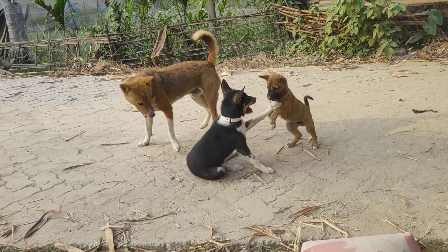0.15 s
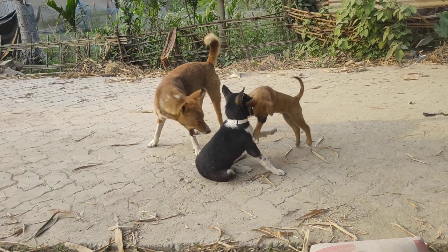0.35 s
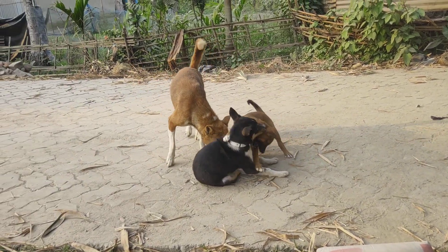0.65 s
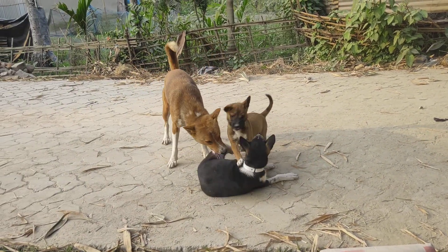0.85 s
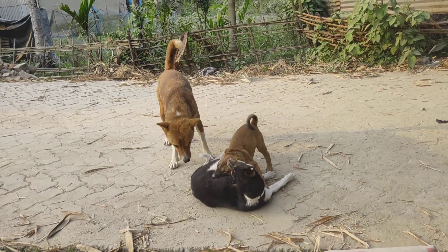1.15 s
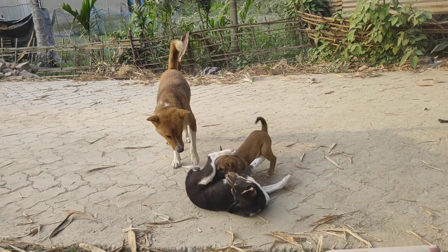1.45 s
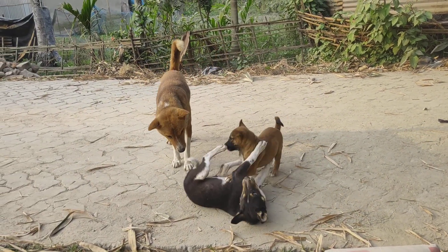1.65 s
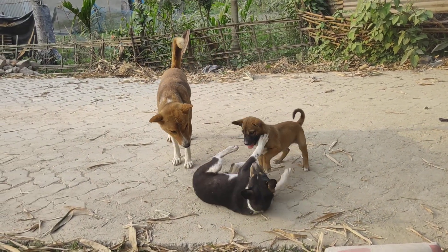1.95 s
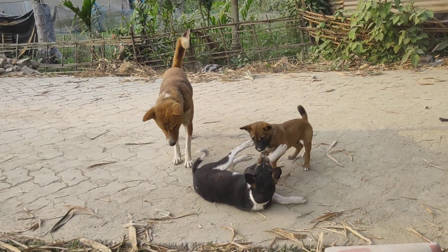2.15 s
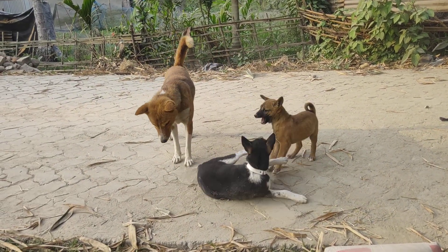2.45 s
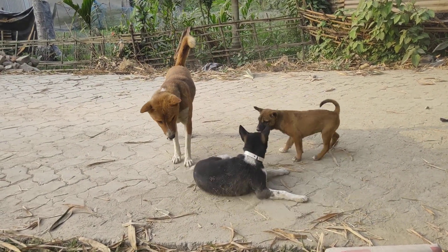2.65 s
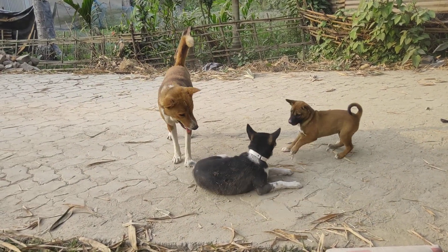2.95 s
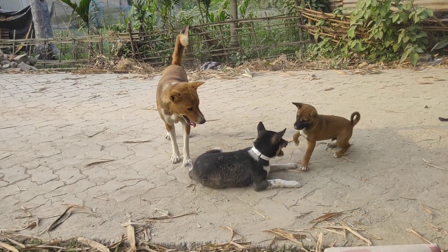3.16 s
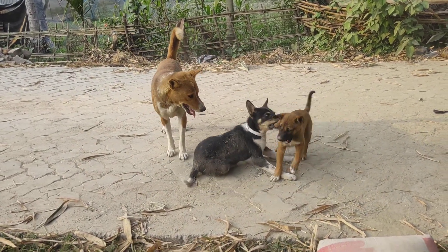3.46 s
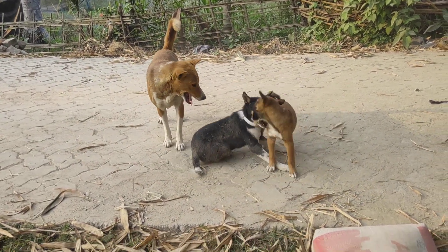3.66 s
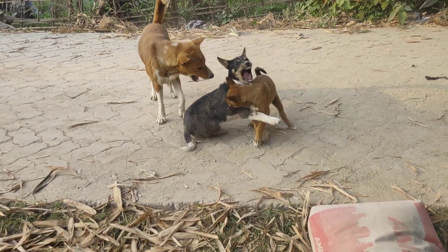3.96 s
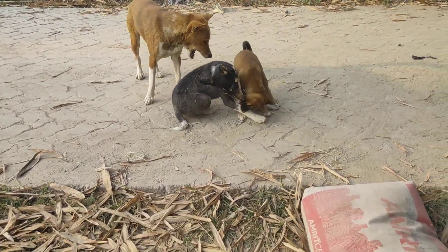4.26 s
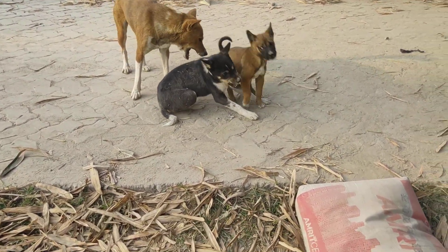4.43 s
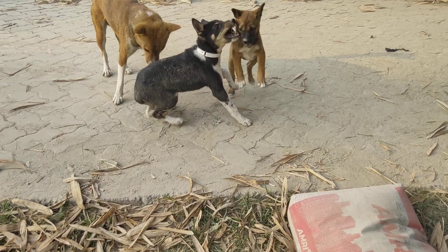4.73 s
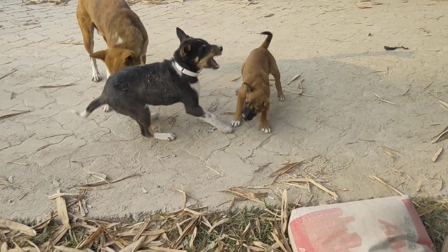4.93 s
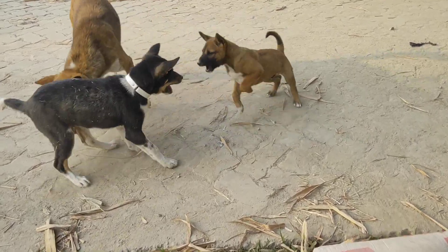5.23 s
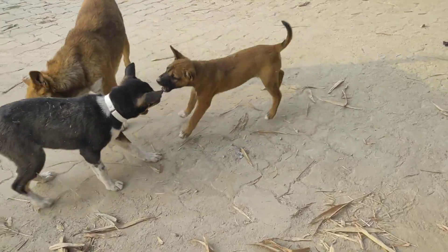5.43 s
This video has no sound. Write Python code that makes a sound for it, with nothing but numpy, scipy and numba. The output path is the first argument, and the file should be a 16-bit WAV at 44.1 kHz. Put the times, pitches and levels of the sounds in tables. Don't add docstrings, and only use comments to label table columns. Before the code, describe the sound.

Dogs wrestle a few metres from a handheld stereo microphone. At first there are only claw clicks, dragging paws and hedge birds, then a small yelp and soft throaty rumbles. Around the middle, brief squeaks and a faint whimper precede wavering growls that grow rougher and louder. The last second holds raspy, high-pitched barks over rustling dry leaves, with short echoes from ground and fence.

```python
import sys
import numpy as np
from scipy import signal
from scipy.fft import next_fast_len
from scipy.io import wavfile
from scipy.ndimage import uniform_filter1d, minimum_filter1d
from numba import njit

SR = 44100
rng = np.random.default_rng(int(sys.argv[2]) if len(sys.argv) > 2 else 0)


def put_to_file(sound):
    columns = np.atleast_2d(sound).T
    safe = np.clip(columns, -1, 1)
    whole_steps = np.round(safe * 32767)
    wavfile.write(sys.argv[1], SR, whole_steps.astype(np.int16))


def boost_factor(decibels):
    exponent = np.asarray(decibels, float) / 20
    return 10 ** exponent


N = 246519
TIME = np.arange(N) / SR

# [pitch_hz, density_db_per_hz]
YARD_SPECTRUM = [(25, -21.5), (40, -6), (52, -19), (82, -1.5), (120, -10.5), (228, -7), (446, -26.5),
                 (607, -18.5), (860, -22), (1150, -16.5), (2140, -26), (2910, -24), (3840, -45),
                 (4540, -33.5), (8650, -48.5), (16000, -85)]
YARD_DB = -63
# [time_s, change_db]
BREEZE = [(0, -6.5), (.3, -2), (.42, -12), (.6, -10.5), (.7, 7), (1.5, 0.5), (1.62, -13), (1.75, -4.5),
          (1.9, 1.5), (2.2, -2.5), (2.34, -10), (2.42, 3), (3.05, 2), (3.15, -5), (3.42, -10.5), (3.5, 5)]
# [time_s, change_db]
LEAF_HUSH = [(0, -7.5), (.11, -22), (.13, 3), (.6, 0), (.7, 7.5), (1.55, 2), (1.66, -13), (1.85, -22),
             (1.95, 5), (2.2, 0), (2.33, -7), (2.45, 5.5), (3.15, 5.5), (3.3, 5.5), (3.5, 4)]

# [start_s, length_s, first_hz, last_hz, level_db]
BIRD_SLIDES = [(0.0, .11, 3640, 3480, -72), (1.655, .055, 2970, 3000, -66), (1.715, .06, 3000, 2960, -78),
               (1.875, .035, 3400, 2500, -62), (2.325, .06, 2570, 2550, -63),
               (2.385, .035, 2520, 2570, -68), (2.43, .07, 2560, 2530, -74), (2.535, .065, 4850, 4450, -69),
               (2.66, .065, 4180, 3930, -65), (2.815, .06, 3800, 3630, -66), (3.19, .05, 3700, 3560, -65),
               (3.345, .06, 4600, 4540, -73)]
# [start_s, length_s, rim_hz, turning_hz, level_db]
BIRD_BENDS = [
    (.26, .11, 4450, 3890, -68),
    (3.415, .08, 4400, 3960, -65),
    (2.92, .13, 3640, 3710, -68),
    (3.04, .15, 3690, 3590, -66),
]
# [start_s, length_s, first_hz, last_hz, level_db]
BIRD_DROPS = [
    (4.72, .09, 5350, 3600, -69),
    (1.695, .04, 4600, 4050, -82),
    (1.77, .085, 2970, 3450, -68),
]
# [start_s, length_s, rim_hz, turning_hz, level_db]
CHIRPS = [
    (.845, .075, 3010, 3100, -65),
    (1.172, .085, 3170, 3330, -58),
    (1.385, .1, 3000, 3200, -63),
]
NOTE_EDGE, NOTE_EDGE_DB = .22, -8

# [loudest_s, length_s, level_db]
DUST = [(.19, 0.13, -74), (.42, 0.16, -76), (.68, 0.59, -66), (.95, 0.32, -71), (1.25, 0.28, -70),
        (1.51, 0.17, -64.5), (1.76, .05, -77), (2.04, 0.12, -60), (2.37, 0.06, -64.5), (2.52, 0.71, -68.5),
        (2.79, 0.4, -58), (3.32, 0.24, -59.5), (3.6, 0.58, -63.5), (4.08, 0.5, -71), (4.4, 0.063, -55.5),
        (4.58, 0.44, -61), (5.0, 0.52, -57.5), (5.3, 0.15, -58.5), (5.45, 0.066, -59), (5.59, 0.31, -50)]
# [loudest_s, length_s, thud_db, scrape_db, grit_db]
SCUFFS = [(.2, 0.43, -71, -57, -110), (.45, 0.7, -101, -61.5, -91), (.778, 0.15, -70, -54.5, -63.5),
          (1.036, 0.025, -52.5, -80, -74), (1.15, 0.22, -54, -90, -92), (1.49, 0.32, -73.5, -57.5, -66),
          (1.85, 0.3, -84, -59.5, -84), (2.03, 0.17, -66, -54.5, -59.5), (2.4, 0.14, -95, -61, -85),
          (2.58, 0.52, -74, -56, -92), (3.0, 0.62, -76, -63.5, -90), (3.31, 0.17, -65, -54, -62),
          (3.46, 0.03, -57, -58, -84), (3.78, 0.29, -86, -59.5, -99), (3.97, 0.0099, -75, -47, -90),
          (4.08, 0.074, -68, -83, -92), (4.41, 0.99, -66, -58, -72.5), (4.8, 1, -75, -59.5, -94),
          (5.3, 1, -65.5, -53, -74), (5.44, 0.026, -61, -58, -57.5)]
STROKE_RISE, STROKE_DROP_DB = 0.33, 21.5
# [loudest_s, peak_db, pitch_hz, treble_db, length_ms]
TICKS = [(.128, -55.5, 2660, -2, 8.2), (.166, -58, 2610, -1, 13), (.205, -51.5, 2210, -9.5, 10.6),
         (0.233, -50.5, 1910, -30, 13), (.246, -56, 2700, -4, 2.5), (0.28, -49, 2540, -45, 11),
         (0.475, -44.5, 1845, -37, 6.1), (.686, -47, 2660, 1.5, 2), (.708, -50, 940, -25, 5.4),
         (.803, -46, 2110, -26, 5.8), (1.095, -54.5, 2400, -13, 3.9), (1.381, -46.5, 2570, -7, 2.6),
         (1.489, -44.5, 2370, -25, 1.3), (1.496, -42, 1840, -0.5, 1.3), (1.517, -47.5, 2000, -9, 2.5),
         (1.522, -43, 2360, -6.5, 1.7), (1.743, -57.5, 1970, -14, 1.5), (1.798, -45.5, 1800, -24, 1.5),
         (1.873, -49, 1590, -15, 1.5), (1.97, -52, 2320, -9, 10), (1.995, -49, 2270, -5.5, 1.4),
         (2.039, -58.5, 2270, -1, 21), (2.13, -51.5, 1690, -17, 2), (2.381, -54, 960, -16, 15),
         (2.415, -54, 1900, -26, 15), (3.122, -57, 2230, -9, 7.5), (3.12, -54.5, 1750, -27, 6.5),
         (3.681, -55, 2930, 0.5, 2.8), (4.402, -56, 695, -2, 5)]

# [start_s, length_s, first_hz, last_hz, level_db]
SQUEAKS = [
    (2.222, 0.081, 2340, 2108, -52),
    (2.298, 0.031, 2570, 2570, -52),
    (5.352, .08, 2350, 2080, -55),
]
# [start_s, length_s, rim_hz, turning_hz, level_db]
WHINES = [
    (2.2, .2, 1160, 1290, -68),
    (4.295, .12, 675, 695, -64),
]
# [start_s, length_s, first_hz,
# last_hz, level_db]
GAPES = [(2.595, 0.084, 1730, 1770, -50), (2.73, 0.056, 2750, 2890, -49.5), (2.8, 0.15, 2900, 2920, -59.5),
         (2.72, 0.31, 1790, 1760, -60.5), (2.965, 0.037, 1800, 1840, -70), (3.456, 0.031, 1770, 1780, -46),
         (3.5, 0.064, 2750, 2720, -60), (3.57, .17, 1700, 1840, -47.5), (3.6, 0.079, 2290, 2340, -55),
         (3.85, 0.12, 1700, 1710, -48.5), (3.935, 0.043, 1726, 1660, -47), (4.125, 0.091, 250, 522, -38.5),
         (4.155, 0.072, 1580, 1560, -45.5), (4.16, 0.041, 2990, 2680, -55), (4.2, 0.089, 534, 614, -44),
         (4.46, 0.026, 2580, 2550, -56), (4.5, 0.067, 1254, 837, -30.5), (4.505, 0.046, 2560, 2420, -40.5),
         (4.53, 0.046, 2160, 2100, -46.5), (4.6, 0.1, 2660, 2550, -55), (4.66, 0.091, 1685, 1680, -40),
         (4.7, 0.034, 3470, 3200, -45.5), (4.945, 0.061, 1690, 1950, -43), (4.985, 0.0535, 2080, 2400, -33),
         (4.995, 0.04, 1770, 1670, -31.5), (4.99, 0.034, 3550, 3680, -45), (5.01, 0.043, 2530, 2870, -40),
         (5.07, 0.068, 1620, 1590, -42), (5.1, 0.081, 2540, 2630, -51.5), (5.18, 0.032, 3630, 3700, -51.5),
         (5.2, 0.064, 2580, 2400, -48), (5.23, 0.049, 1790, 1800, -46), (5.435, 0.058, 2510, 2310, -43.5),
         (5.48, 0.08, 1940, 1930, -41.5), (5.52, 0.044, 3510, 3560, -50),
         (0.732, 0.082, 1890, 2260, -58), (0.974, 0.1, 1360, 1460, -61), (1.143, 0.059, 1770, 1810, -56),
          (1.174, 0.091, 1400, 1460, -56), (1.177, .12, 2150, 1970, -61), (1.18, 0.052, 2800, 2830, -58),
          (1.244, 0.054, 2530, 2540, -63.5), (2.776, .21, 600, 580, -52), (2.74, 0.26, 940, 830, -56)]
# [time_s, length_s, change_db]
SURGES = [(2.66, 0.039, 6.5), (2.685, .012, 4), (2.75, 0.038, 5.5), (2.852, 0.031, 7.5),
          (3.492, 0.0088, 12), (3.51, 0.0057, -3), (3.523, 0.0077, 12), (3.535, 0.0044, -5),
          (3.55, 0.0088, 11), (3.58, 0.012, -4), (3.605, 0.0058, -3), (4.963, 0.0055, 3.5),
          (4.968, 0.0044, -20), (4.977, 0.0074, 5), (5.013, 0.02, -8), (5.032, 0.011, 4), (5.049, 0.015, 8),
          (5.064, 0.0049, 0), (5.07, 0.005, 12), (5.091, 0.0068, 14), (5.133, .008, 4),
          (5.159, 0.0044, 9.5), (5.17, 0.012, 6), (5.188, 0.0047, 9), (5.452, 0.0078, -1),
          (5.477, .006, 2.5), (5.516, 0.0091, 4), (5.534, 0.0034, -3), (5.54, .005, 7.5), (5.578, 0.004, 0)]

# [time_s, chest_hz, chest_db, rasp_db, mouth_hz]
RUMBLES = [
    [(.68, 120, -57, -72, 965), (.742, 155.4, -50.5, -63, 915), (.782, 141.9, -50, -58, 880),
     (.882, 126.1, -54.5, -81, 920), (1.01, 139.5, -51, -54, 990), (1.066, 152, -59, -69, 1050),
     (1.12, 119.9, -50, -97, 1037)],
    [(1.1, 124.6, -71, -52.5, 1000), (1.128, 106.6, -48, -65, 940), (1.176, 123, -45.5, -47, 910),
     (1.236, 123.4, -44.5, -46, 940), (1.36, 90, -59, -67, 910)],
]
# [time_s, chest_hz, chest_db, rasp_db, mouth_hz]
GROWLS = [
    [(2.6, 151.2, -64, -64, 1350), (2.625, 158.6, -51, -50.5, 1330), (2.654, 172, -43, -48.5, 1270),
     (2.712, 156.8, -47.5, -52, 1210), (2.75, 168.5, -43.5, -50.5, 1175), (2.864, 177.3, -44.5, -53, 1190),
     (2.975, 172, -44.5, -54.5, 1067), (3.0, 167, -79, -67, 1177)],
    [(3.447, 145.2, -74, -58, 1400), (3.468, 154.2, -39, -45, 1350), (3.498, 174.3, -43.5, -45.5, 1350),
     (3.626, 197.9, -39.5, -41.5, 1306), (3.714, 175.5, -41, -39.5, 1296), (3.76, 159.9, -69, -73, 1320)],
    [(3.85, 179.8, -66, -69, 1200), (3.88, 176.3, -46, -42, 1200), (3.942, 185.4, -46, -52, 1190),
     (3.98, 189, -89, -98, 1200)],
    [(4.12, 188.7, -57, -99, 1230), (4.162, 209.7, -47.5, -43, 1240), (4.252, 212.8, -39.5, -45, 1230),
     (4.31, 198, -64, -60, 1160)],
]
# [time_s, chest_hz, chest_db, rasp_db, mouth_hz]
BARKS = [
    [(4.438, 160.2, -49.5, -56, 994), (4.474, 188.6, -40, -46, 1060), (4.532, 306.1, -37, -32.5, 914),
     (4.562, 261.2, -37.5, -40.5, 870), (4.61, 206.9, -39, -40, 1020), (4.715, 260, -36, -33, 1023),
     (4.762, 196, -45.5, -49, 1060)],
    [(4.893, 165.8, -45, -41, 1060), (4.94, 188.7, -42.5, -38.5, 1160), (4.96, 195.4, -47.5, -33.5, 1200),
     (4.985, 225.8, -35.5, -30, 1234), (5.022, 310.6, -34.5, -30.5, 1050), (5.07, 233, -32.5, -37, 1135),
     (5.15, 245.5, -32.5, -30, 1053), (5.2, 208.6, -36.5, -38, 1100), (5.252, 199.8, -38.5, -44.5, 1200),
     (5.278, 161, -55, -51, 1230)],
    [(5.43, 177, -44, -49.5, 1100), (5.456, 194.6, -37.5, -34, 1087), (5.538, 250.9, -34.5, -29.5, 1074),
     (5.59, 238.4, -37.5, -27, 1164)],
]
# [time_s, chest_hz, chest_db, rasp_db, mouth_hz]
YELPS = [
    [(.58, 136.1, -55, -91, 1240), (.626, 186.2, -49, -59.5, 1240), (.67, 219.4, -72, -60, 1320)],
]
# [partials_db, throat_db, muzzle_db, muzzle_hz]
RUMBLE_POSES = [(-5, -12.5, -2.5, 1800), (0.5, -12, -13, 1820)]
GROWL_POSES = [(-3.5, -11, -6.5, 1715), (-7.5, -16, -9.5, 1630), (0, -7, -5.5, 1660),
               (-7.5, 0.5, -14, 1440)]
BARK_POSES = [(-13.5, -5.5, -10, 1620), (-10.5, -11, -9, 1620), (-22.5, -14.5, -13.5, 1740)]
YELP_POSES = [(-1.5, -6.5, 3.5, 1790)]
# [multiple, level_db]
RUMBLE_LINES = [(1.5, -2), (2, -3), (2.5, -9), (.5, -18)]
GROWL_LINES = [(1.5, -4), (2, -7), (2.5, -13), (.5, -20)]
BARK_LINES = [(2, 1.5), (3, -11), (4, 0)]
# [pitch_hz, width_hz, level_db]
MUZZLE = [(2740, 420, -4), (3500, 440, -8.5), (4260, 740, -10.5), (6930, 1700, -19.5)]
THROAT_HZ, MOUTH_WIDTH_HZ = 544, 245
THROAT_LIFT_DB = 5
PARTIAL_DRIFT = .15
PARTIALS_SHARE, THROAT_SHARE, MUZZLE_SHARE = 0.16, 0.31, 0.67

# [time_s, lag_ms]
DOG_LAG = [(0, 0.1), (1.2, 0.15), (2.8, 0.14), (4.0, 0.16), (4.6, 0.16), (5.6, 0.21)]
# [delay_ms, level_db]
ECHOES = [(3.1, -9.5), (7.3, -20), (13.0, -16.5), (23.0, -13), (41.0, -62), (67.0, -15)]
# [pitch_hz, threshold_db]
THRIFT = [(2800, -8), (3600, -2), (5000, -.6), (7000, 1), (9000, 1.8), (15000, 1.9)]
TOP_HZ = 15790


def unit(x):
    return x / np.sqrt(np.mean(x ** 2) + 1e-18)


@njit
def svf(x, hz, width):
    y, b, l = np.empty(len(x)), 0., 0.
    for i in range(len(x)):
        g, k = np.tan(np.pi * hz[i] / SR), width / hz[i]
        v = (b + g * (x[i] - l)) / (1 + g * (g + k))
        b, l, y[i] = 2 * v - b, l + 2 * g * v, k * v
    return y


def band(x, hz, width_hz):
    hz = np.clip(hz * np.ones(len(x)), 10, .45 * SR)
    return svf(svf(x, hz, 1.075 * width_hz), hz, 1.075 * width_hz)


def walk(rate_hz, n=N):
    k = int(SR / rate_hz)
    held = np.repeat(rng.standard_normal(n // k + 1), k)
    return 1.3 * uniform_filter1d(uniform_filter1d(held, k), k)[:n]


def play(tables, sound, fade_s=0.0024, drive=None):
    out = np.zeros(N)
    for table in tables:
        s, *columns = np.transpose(table)
        a, b = int(s[0] * SR), min(int(s[-1] * SR), N)
        t = TIME[a:b]
        fade = np.clip(np.minimum(t - s[0], s[-1] - t) / fade_s, 0, 1)
        curves = [np.interp(t, s, c) for c in columns]
        if drive is not None:
            curves.append(drive[a:b])
        out[a:b] += fade * sound(*curves)
    return out


def even(u):
    return u


def bend(u, turn=.38):
    return np.sin(np.pi * u ** (np.log(.5) / np.log(turn))) ** 2


def note_curves(rows, shape):
    u = np.linspace(0, 1, num=17)
    edge_db = NOTE_EDGE_DB * (1 - np.clip(np.minimum(u, 1 - u) / NOTE_EDGE, 0, 1)) ** 2
    return [np.transpose([s + u * length, first + (last - first) * shape(u), db + edge_db])
            for s, length, first, last, db in rows]


def strokes(rows):
    power = 1e-13
    for s, length, *db in rows:
        away = np.maximum((s - TIME) / STROKE_RISE, TIME - s) / length
        power = power + boost_factor(2 * (np.array(db)[:, None] - STROKE_DROP_DB * away))
    return 10 * np.log10(power)


def tone(hz, db, wobble=0.015, flutter_db=9.0):
    n = len(hz)
    phase = 2 * np.pi * np.cumsum(hz * (1 + wobble * walk(71.4, n))) / SR
    return np.sqrt(2) * boost_factor(db + flutter_db * walk(69.0, n)) * np.sin(phase)


def spaced(x, lag_ms, left_db, wet_db, shade_db=-47.0):
    late = np.interp(TIME - lag_ms / 1000, TIME, x)
    late = late + boost_factor(shade_db) * band(late, 2770.0, 2350.0)
    out = np.array([late * boost_factor(left_db / 2), x * boost_factor(-left_db / 2)])
    reflected = band(x, 3840.0, 4000.0)
    for side, skew in zip(out, (.93, 1.08)):
        for ms, db in ECHOES:
            k = int(ms * skew * SR / 1000)
            side[k:] += boost_factor(db + wet_db) * reflected[:-k]
    alike = signal.lfilter(*signal.butter(1, 170., fs=SR), out[0] - out[1]) / 2
    return out - alike * np.array([[1], [-1]])


def yard():
    out, swell = 0, walk(3.7)
    f, level_db = np.transpose(YARD_SPECTRUM)
    breeze_db = np.interp(TIME, *np.transpose(BREEZE))
    leaves_db = np.interp(TIME, *np.transpose(LEAF_HUSH))
    for hz in 25 * 2 ** np.arange(0, 9.4, 1 / 3):
        mid, side = (band(rng.standard_normal(N), hz, hz / 4) for _ in range(2))
        db = np.interp(np.log(hz), np.log(f), level_db) + 1.5 * swell + 2.5 * walk(7)
        db += breeze_db * np.exp(-np.log(hz / 450.0) ** 2 / 1.5) + leaves_db * (hz > 3300)
        spread = np.clip(0.073 + hz / 1600.0, 0, 1)
        out = out + boost_factor(db) * (mid + spread * side * np.array([[1], [-1]]))
    return unit(out) * boost_factor(YARD_DB + 4.0)


def chirp(hz, db):
    air = unit(band(rng.standard_normal(len(hz)), hz, .07 * hz.mean()))
    return tone(hz, db - 1.5, .007, 2.5) + boost_factor(db - 5) * air


def whistles():
    clear = note_curves(BIRD_SLIDES, even) + note_curves(BIRD_BENDS, bend)
    clear += note_curves(BIRD_DROPS, lambda u: u ** 2.0)
    clear_song = play(clear, lambda hz, db: tone(hz, db - 2, .003, 2.0), fade_s=.012)
    return clear_song + play(note_curves(CHIRPS, bend), chirp)


def hedge(x, t60_s=.3, wet_db=-7.0):
    t = TIME[:SR // 3]
    tail = rng.standard_normal(len(t)) * boost_factor(-60 * t / t60_s)
    return x + boost_factor(wet_db) * signal.fftconvolve(x, tail / np.linalg.norm(tail))[:N]


def grains(n, spread_db):
    return rng.standard_normal(n) * boost_factor(spread_db * walk(400, n))


def dust():
    hiss = grains(N, 3.7)
    low, high = unit(band(hiss, 12500.0, 11000.0)), unit(band(hiss, 15500.0, 6000.0))
    return boost_factor(strokes(DUST)[0]) * unit(low + boost_factor(-3) * high)


def scuff(thud_db, scrape_db, grit_db):
    grit = grains(len(thud_db), 2.5)
    parts = (thud_db, 620., 600.), (scrape_db, 2100., 1700.), (grit_db, 5200., 2600.)
    return sum(boost_factor(db) * unit(band(grit, hz, width)) for db, hz, width in parts)


def ticks():
    out, t = np.zeros(N), TIME[:SR // 10] - .04
    for s, db, hz, treble_db, ms in TICKS:
        noise = rng.standard_normal(len(t))
        swell = np.exp(-(t / (ms / 1000 * np.where(t < 0, .8, 1.2))) ** 2)
        ring = 0.61 * np.sin(2 * np.pi * hz * t) + 0.61 * unit(band(noise, hz, 620.0 + 940.0 / ms))
        crack = boost_factor(treble_db) * unit(band(noise, 4260.0, 3300.0))
        out[int((s + t[0]) * SR):][:len(t)] += boost_factor(db) * swell * (ring + crack)
    return out


def squeak(hz, db):
    air = boost_factor(db - 6) * unit(band(rng.standard_normal(len(hz)), hz - 100, 400.0))
    return tone(hz, db, .004, 1.2) + tone(hz - 240, db - 6, .006, 2.0) + air


def gape(hz, db, puffs):
    n = len(hz)
    breath = puffs * boost_factor(2.0 * walk(80, n)) * rng.standard_normal(n)
    return boost_factor(db) * unit(band(breath, hz, 60 + .08 * hz.mean()))


@njit
def folds(hz, stretch, size):
    pulses, gate, turns, p, k = np.zeros(len(hz) + 1), np.empty(len(hz)), np.empty(len(hz)), 0., 0
    for i in range(len(hz)):
        step = hz[i] * stretch[k] / SR
        p += step
        if p >= 1:
            p, k = p - 1, k + 1
            pulses[i] += size[k] * p / step
            pulses[i + 1] += size[k] * (1 - p / step)
        gate[i], turns[i] = size[k] * (.25 + np.sin(np.pi * p) ** 2), k + p
    return pulses[:-1], gate, turns


def voice(hz, tone_db, lines_db, throat_db, mouth_db, mouth_hz, muzzle_db, muzzle_hz,
          lines, rough, limp_db, smear_db):
    n = len(hz)
    stretch, strength = rng.standard_normal((2, n // 60))
    limp = limp_db * (-1.) ** np.arange(n // 60)
    size = boost_factor(2.0 * strength + limp)
    pulses, puff, turns = folds(hz * (1 + .015 * walk(30, n)), 1 + .03 * stretch, size)
    breath = unit(puff * rng.standard_normal(n))
    source = np.sqrt(1 - rough) * unit(pulses) + np.sqrt(rough) * breath

    def ring(f, width):
        return unit(band(boost_factor(1.8 * walk(70, n)) * source, f, width))

    muzzle = ring(muzzle_hz, 188.0)
    for f, width, db in MUZZLE:
        muzzle = muzzle + boost_factor(db + 2.55 * walk(27.2, n)) * ring(f * (1 + 0.021 * walk(17, n)), width)
    chest = boost_factor(tone_db + 1.9 * walk(70, n)) * np.sin(2 * np.pi * turns)
    smear = smear_db * np.clip(hz / 60 - 2, .3, 1)
    upper = 0
    for k, db in lines:
        lift_db = THROAT_LIFT_DB * np.exp(-((k * hz - THROAT_HZ) / 93.0) ** 2)
        level = boost_factor(db + lift_db + smear * walk(106.6, n))
        upper = upper + level * np.sin(2 * np.pi * k * turns + PARTIAL_DRIFT * smear * walk(44.6, n))
    cavities = boost_factor(throat_db) * ring(THROAT_HZ, 186.0) + boost_factor(mouth_db) * ring(mouth_hz, MOUTH_WIDTH_HZ)
    return np.sqrt(2) * (chest + boost_factor(lines_db) * upper) + cavities + boost_factor(muzzle_db) * unit(muzzle)


def calls(tables, poses, lines, rough, limp_db, smear_db):
    out = 0
    for table, (partials_db, throat_db, muzzle_db, muzzle_hz) in zip(tables, poses):
        def call(hz, chest, rasp, mouth_hz):
            mix = lambda share: chest + share * (rasp - chest)
            return voice(hz, chest, mix(PARTIALS_SHARE) + partials_db, mix(THROAT_SHARE) + throat_db,
                         rasp, mouth_hz, mix(MUZZLE_SHARE) + muzzle_db, muzzle_hz,
                         lines, rough, limp_db, smear_db)
        out = out + play([table], call)
    return out


def puppies():
    rumbles = calls(RUMBLES, RUMBLE_POSES, RUMBLE_LINES, rough=.45, limp_db=1.6, smear_db=6.0)
    growls = calls(GROWLS, GROWL_POSES, GROWL_LINES, rough=.33, limp_db=2.0, smear_db=5.0)
    barks = calls(BARKS, BARK_POSES, BARK_LINES, rough=.2, limp_db=.8, smear_db=2.4)
    yelps = calls(YELPS, YELP_POSES, GROWL_LINES, rough=.75, limp_db=1.8, smear_db=6.0)
    surge_db = sum(db * np.exp(-((TIME - s) / length) ** 2) for s, length, db in SURGES)
    mouths = (boost_factor(surge_db) - 1) * band(growls + barks, 953.0, 700.0)
    chest = signal.hilbert(band(rumbles + growls + barks, 200., 220.), next_fast_len(N))[:N]
    puffs = .2 + (1 + np.cos(np.angle(chest))) ** 2 / 2
    gapes = play(note_curves(GAPES, even), gape, fade_s=0.01, drive=puffs)
    whines = play(note_curves(WHINES, bend), lambda hz, db: tone(hz, db, flutter_db=2.5))
    return rumbles + growls + barks + mouths + yelps + whines + gapes


def scene():
    birds = spaced(hedge(whistles()), lag_ms=0.42, left_db=20.5, wet_db=4.5)
    near_ground = np.array([scuff(*strokes(SCUFFS)) + boost_factor(-5.5) * dust() for _ in range(2)])
    leaves = spaced(boost_factor(-0.5) * dust(), lag_ms=0.1263, left_db=3.5, wet_db=-30.0)
    claws = spaced(ticks(), lag_ms=.42, left_db=9.5, wet_db=0.0)
    squeaks = play(note_curves(SQUEAKS, even), squeak, fade_s=0.004)
    squeaks = spaced(squeaks, lag_ms=0.39, left_db=12.5, wet_db=6.0)
    dog_lag_ms = np.interp(TIME, *np.transpose(DOG_LAG))
    dogs = spaced(puppies(), dog_lag_ms, left_db=0.05, wet_db=3.0, shade_db=1.5)
    return yard() + birds + near_ground + leaves + claws + squeaks + dogs


def thin(x):
    frames = dict(fs=SR, window="cosine", nperseg=2048, noverlap=1024)
    lead = 242
    hz, _, z = signal.stft(np.pad(x, ((0, 0), (lead, 0))), **frames)
    power = uniform_filter1d(np.abs(z) ** 2, size=2, axis=2)
    patch = uniform_filter1d(power, size=6, axis=1)
    around = minimum_filter1d(uniform_filter1d(power, size=40, axis=1), size=20, axis=1)
    bar = boost_factor(2 * np.interp(hz, *np.transpose(THRIFT), left=-99))[:, None]
    return signal.istft(z * (patch > bar * around), **frames)[1][:, lead:lead + N]


def top_cut(x):
    return signal.sosfilt(signal.butter(12, 16360, fs=SR, output="sos"), x)


def record(dry):
    low_pass = signal.ellip(10, .2, 70, TOP_HZ, fs=SR, output="sos")
    mix = signal.sosfilt(low_pass, thin(dry))
    return top_cut(mix)


dry = scene()
out = record(dry)
put_to_file(out)
```